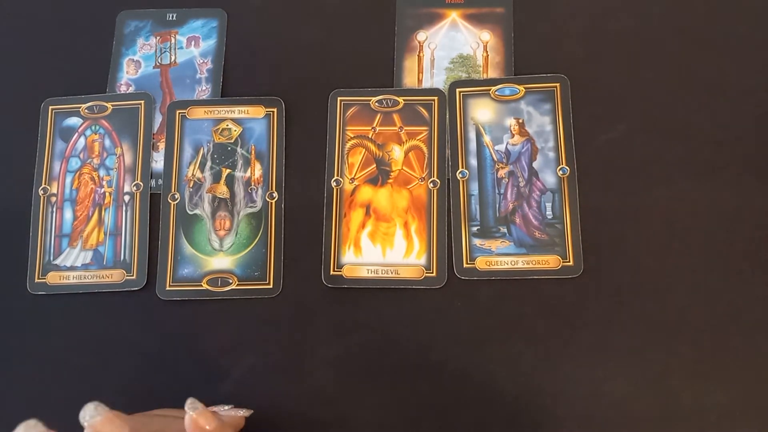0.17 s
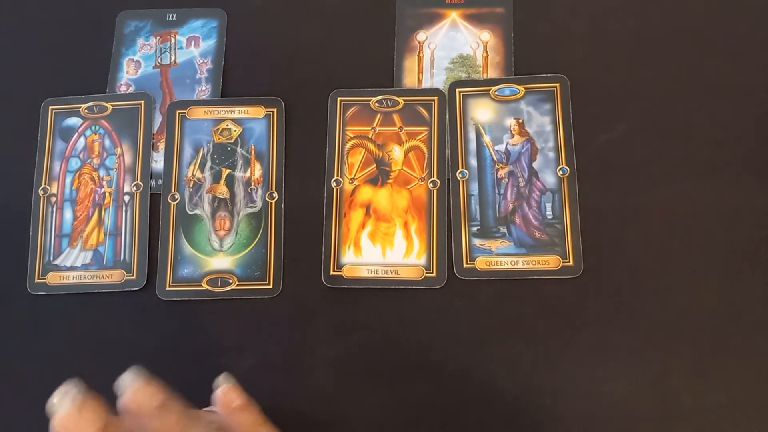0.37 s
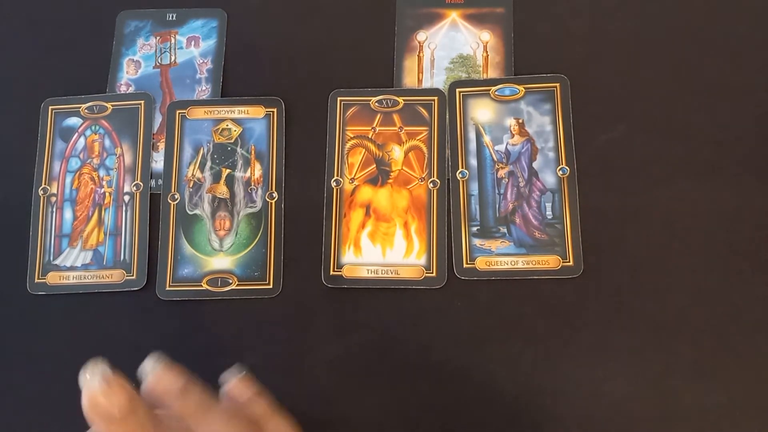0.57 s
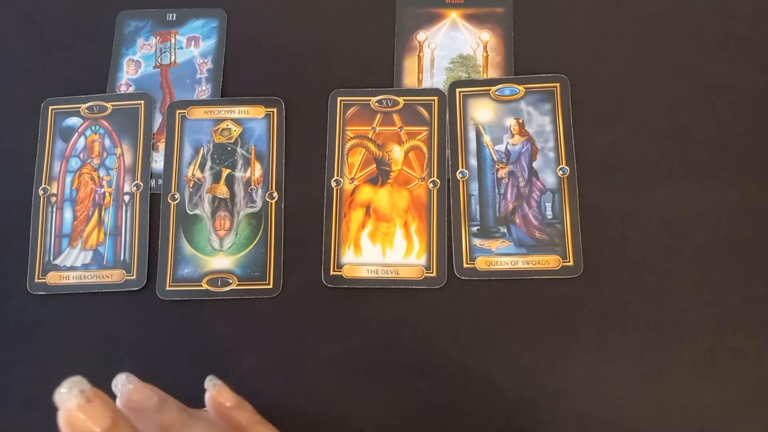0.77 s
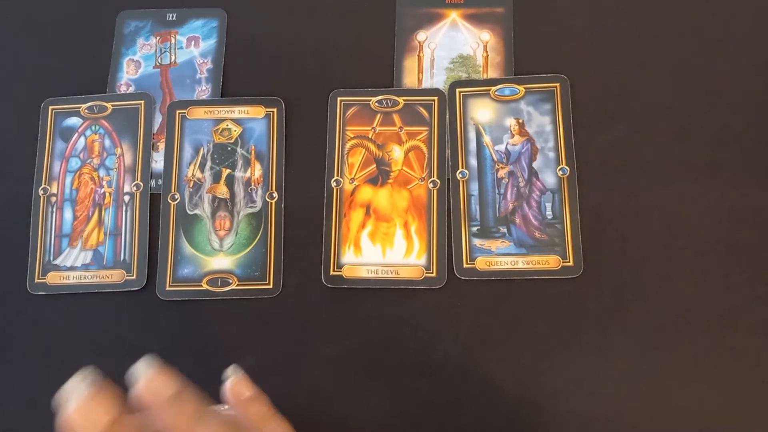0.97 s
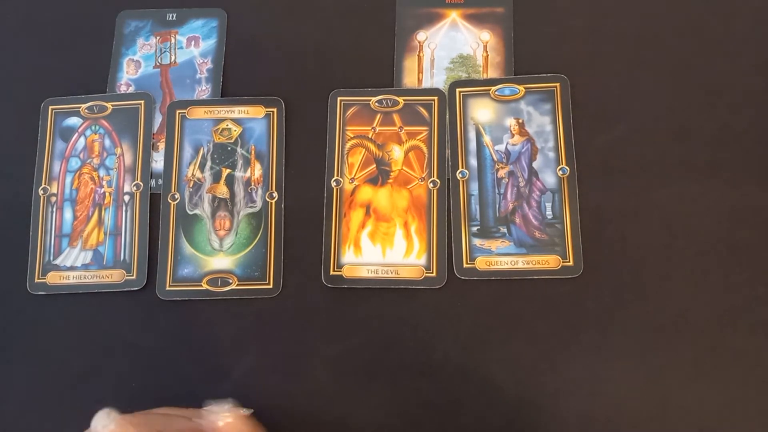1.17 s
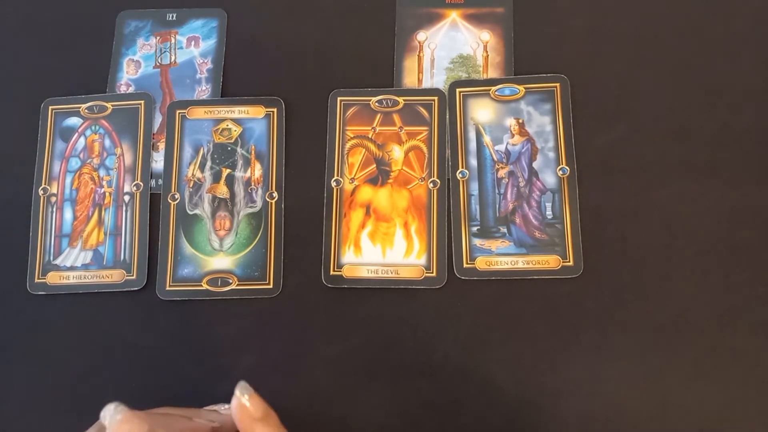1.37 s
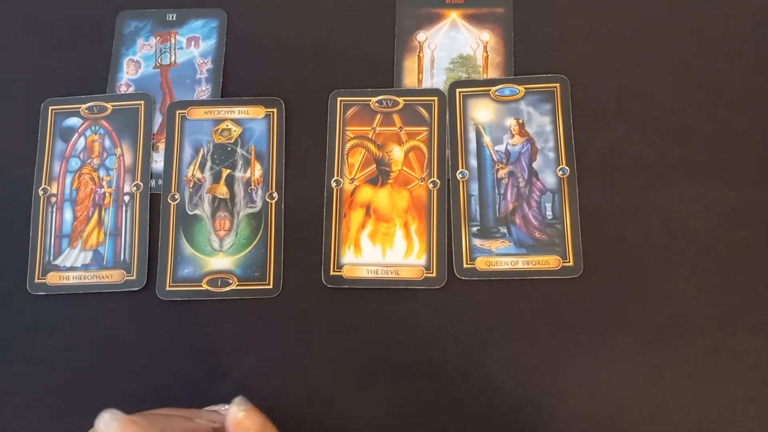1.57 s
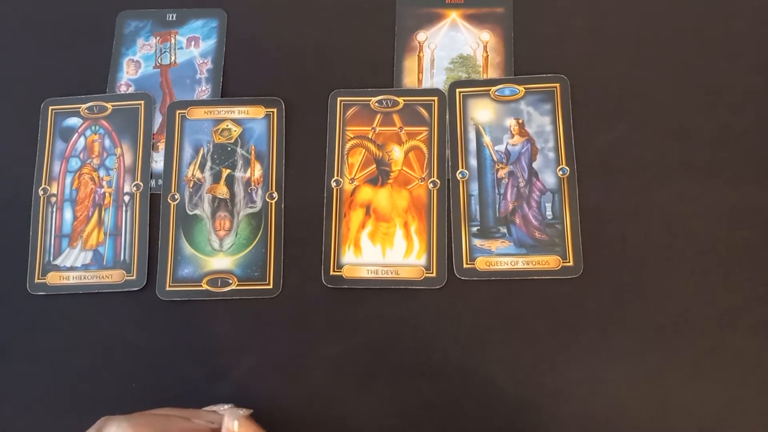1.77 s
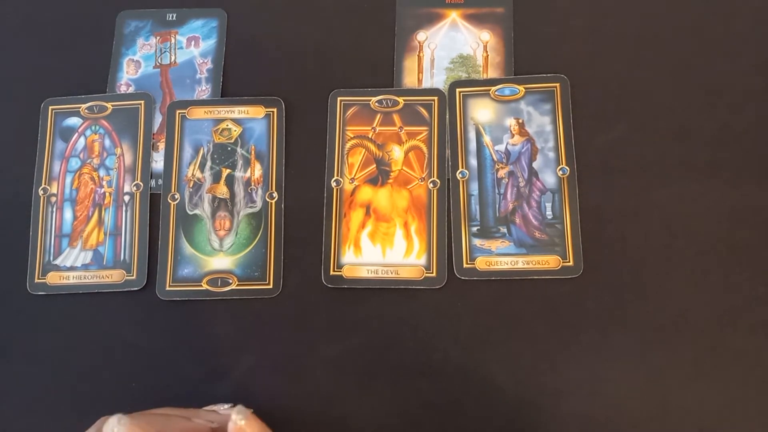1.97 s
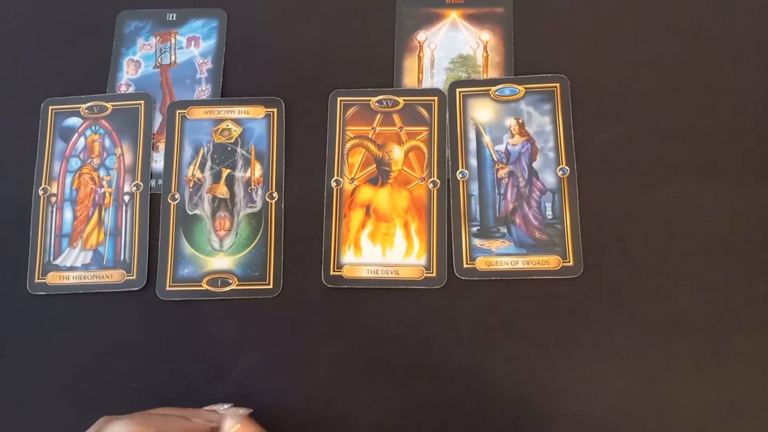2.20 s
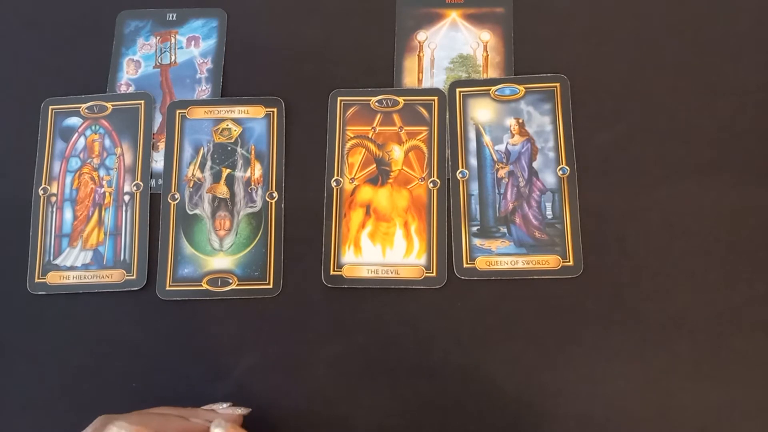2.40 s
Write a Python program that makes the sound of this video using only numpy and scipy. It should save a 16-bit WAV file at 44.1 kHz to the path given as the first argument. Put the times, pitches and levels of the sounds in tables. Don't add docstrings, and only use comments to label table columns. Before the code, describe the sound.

Soft uneven finger taps on a wooden table, about four a second, start at once and continue throughout; dull boomy thuds, tiny nail clicks, short room echo, low hum, and muffled car noise rising late.

```python
import sys
import numpy as np
from scipy import signal
from scipy.fft import rfft, irfft, next_fast_len
from scipy.io import wavfile
from scipy.ndimage import uniform_filter1d

SR = 44100
rng = np.random.default_rng(int(sys.argv[2]) if len(sys.argv) > 2 else 0)


def decibels_to_gain(level_db):
    exponent = np.asarray(level_db, float) / 20
    return 10 ** exponent


def store_wav(level_fs):
    pcm = np.round(np.clip(np.atleast_2d(level_fs), -1, 1) * 32767)
    wavfile.write(sys.argv[1], SR, pcm.T.astype(np.int16))


N = 107515

# f/Hz, level/dB
HUM_BODY = [(15, -75), (25, -31), (87, -0.5), (443, -28.5), (974, -37.5), (1180, -44.5), (2320, -41),
            (3040, -52.5), (16400, -53)]
# f/Hz, likeness (1 = alike)
HUM_LIKENESS = [(60, 0.98), (180, 0.42), (550, 0.15), (1650, 0.073), (4970, 0.033), (15000, 0.02)]
# t/s, level/dB
CAR_FADER = [
    (0.0, -104),
    (0.66, -82),
    (0.79, -78),
    (1.25, -78),
    (1.42, -71),
    (1.7, -70.5),
    (2.14, -65.5),
    (2.31, -65),
    (2.44, -62),
]
# f/Hz, level/dB
CAR_BODY = [(60, -3.5), (150, 6.5), (400, 2), (660, -6), (850, -2.5), (1090, -3.5), (1400, -12.5),
            (3000, -36.5)]
# f/Hz, likeness (negative = opposed)
CAR_LIKENESS = [(100, 0.9), (400, 0.91), (900, -0.23), (2000, -0.63)]
# t/s, thud level/dB, time until the level drops faster/s, lowest mode boost/dB
TAPS = [(.0134, -0.5, 0.068, 2.1), (.3138, 1.5, 0.096, 0), (.619, 2.5, 0.072, -2.2), (.9251, 2, .07, 0.8),
        (1.2389, 5, 0.084, -1.5), (1.4289, -1, 0.062, 1.5), (1.6213, -6, 0.06, 2.5),
        (1.7799, 2, 0.072, -4.5), (1.9137, -3.5, 0.07, 2.5), (2.1038, -2, 0.076, 0.5),
        (2.2729, -6.5, 0.02, 1), (2.4102, -1, .066, 1)]
BOARD_HZ = [68.9, 94.2, 121.8, 143.4, 184.4, 201, 228.8, 254.9, 272, 296.3, 333.5, 367.2]
IN_PHASE = [0, 3]
# level/dB, t60/s, rise/s, left-right balance/dB
BOARD_MODES = [(-36.5, 1.04, 0.024, -3.6), (-42.5, 0.2, 0.00074, -0.5), (-34, .11, 0.00035, -1.5),
               (-33.5, 0.038, 0.0018, -15.5), (-40, 0.29, 0.021, 1.5), (-44, 0.35, 0.0046, -5.7),
               (-37.5, 0.17, 0.023, 0), (-41.5, 0.29, 0.025, -7), (-43, 0.21, 0.00093, -0.5),
               (-56.5, 0.56, 0.0018, 1.5), (-45.5, 0.59, 0.0018, -1), (-56, 0.23, 0.008, 14.5), ]
# f/Hz, level/dB
WOOD_BODY = [(300, -5), (450, -9.5), (600, -21.5), (1000, -32.5), (1500, -33), (3000, -45)]
# t/s, nail ring f/Hz, second (mostly lower) ring f/Hz
TICK_PITCHES = [(.0147, 3700, 1370), (.314, 4050, 1370), (.6194, 8390, 4800), (.926, 7430, 4000),
                (1.2394, 7430, 1300), (1.4293, 7300, 3950), (1.4635, 11500, 7500), (1.6205, 7300, 9000),
                (1.7806, 7560, 1250), (1.9134, 7420, 11000), (2.1039, 7560, 4400), (2.2646, 8370, 5500),
                (2.4097, 8920, 4200)]
# click level/dB, nail ring level/dB, second ring level/dB
TICK_LEVELS = [(-45.5, -7, -14), (-45.5, -5, -10), (-42.5, -13, -6), (-49.5, 7, -3.5), (-50.5, 6, -7),
               (-46, 4, -9), (-69, -6, -11), (-54, -10, -15), (-46, 7, -13), (-59, -11, -2), (-48.5, 5, -6),
               (-58, -6, -11), (-53, 8, -4)]
# f/Hz, level/dB
CLICK_BODY = [(500, -28.5), (1300, -11.5), (2300, -9.5), (3500, -17.5), (5800, -9), (8400, 1.5),
              (12000, -5.5), (16000, -6)]
# t/s, level/dB
ECHOES = [
    (.0028, -9),
    (.0085, -10),
    (.0115, -15),
]
# f/Hz, level/dB
TICK_PAN = [(2000, 0), (5000, -2), (8000, 8), (14000, 4)]
# f/Hz, t60/s
ROOM_DECAY = [(500, 1), (2000, 0.55), (6000, 0.43), (14000, 0.12)]
# f/Hz, t60/s
SCATTER_DECAY = [(1000, .07), (4500, .09), (15000, .05)]
# f/Hz, t60/s
BOOM_DECAY = [(60, 0.076), (130, 0.94), (330, 0.53), (600, 0.37)]
# t/s, level/dB, f/Hz, length/s
LEANS = [
    (2.17, -38, 83.8, .1),
    (0.34, -49.5, 78.1, 0.13),
    (3.5, -39, 78.5, 0.049),
]
# t/s, level/dB
RUB_FADER = [
    (0.6, -94.5),
    (1.3, -79),
    (1.396, -79),
    (1.776, -77.5),
    (2.438, -83.5),
]
# f/Hz, level/dB
RUB_BODY = [(1500, -12), (2500, 0.5), (3200, -6.5), (5300, -13.5), (6300, -6.5), (7500, -2.5), (9000, -34),
            (16000, -9.5)]
# f/Hz, likeness
RUB_LIKENESS = [(2000, 0.05), (8000, 0.2)]
# f/Hz, level/dB
MIC = [(20, -26), (45, -9), (65, 0), (15750, 0), (15950, -18), (20000, -24)]

LEFT_LAG_S = 0.00027
HALVES = np.array([[0.5], [-0.5]])


def evened(x):
    return x / np.sqrt(np.mean(x ** 2) + 1e-20)


def read(points, hz):
    f, value = np.transpose(points)
    return np.interp(np.log(hz + 1), np.log(f + 1), value)


def add(mix, s, sound):
    part = mix[:, round(s * SR):][:, :sound.shape[1]]
    part += sound[:, :part.shape[1]]


def causal(points):
    log = np.log(decibels_to_gain(read(points, abs(np.fft.fftfreq(4096, 1 / SR)))))
    taps = np.fft.ifft(np.exp(log - 1j * signal.hilbert(log).imag)).real[:2048]
    return taps / np.linalg.norm(taps)


def fader(rows):
    s, db = np.transpose(rows)
    return decibels_to_gain(np.interp(np.arange(N) / SR, s, db, left=-120))


def noise(body, likeness):
    patchy_db = 1
    hz = np.fft.rfftfreq(1024, 1 / SR)
    a, b, c, d, patches = rng.standard_normal((N // 256 + 5, 513, 5)).T
    patches = uniform_filter1d(patches, size=8, axis=0)
    patches = evened(uniform_filter1d(patches, size=10, axis=1))
    same = np.clip(read(likeness, hz), -1, 1)[:, None]
    left = a + 1j * b
    right = same * left + np.sqrt(1 - same ** 2) * (c + 1j * d)
    z = np.array([left, right])
    z[0] *= np.exp(-2j * np.pi * hz * LEFT_LAG_S * (hz < 500))[:, None]
    z = z * decibels_to_gain(read(body, hz)[:, None] + patchy_db * patches)
    return evened(signal.istft(z, nperseg=1024, noverlap=768)[1][:, :N])


def tail(decays, db):
    taps = np.zeros((2, SR // 2))
    at = np.arange(40, SR // 2 - 20, 20)
    at = at + rng.integers(0, 20, (2, len(at)))
    np.put_along_axis(taps, at, rng.choice([-1., 1.], at.shape), 1)
    hz, t, z = signal.stft(taps, SR, nperseg=512)
    fade = decibels_to_gain(-60 * t / read(decays, hz)[:, None])
    out = signal.istft(z * fade, SR, nperseg=512)[1]
    return decibels_to_gain(db) * out / np.linalg.norm(out[0])


def room_hum():
    return decibels_to_gain(-56.5) * noise(HUM_BODY, HUM_LIKENESS)


def car():
    return decibels_to_gain(5.0) * fader(CAR_FADER) * noise(CAR_BODY, CAR_LIKENESS)


def late_fade(t, hold):
    fade_t60 = 0.18
    return decibels_to_gain(-60 * np.maximum(t - hold, 0) / fade_t60)


def thud(db, hold, spot):
    lag_cycles = 0.593
    t = np.arange(SR // 3) / SR
    out = np.zeros((2, SR // 3))
    for k, (hz, (mode_db, t60, rise, pan_db)) in enumerate(zip(BOARD_HZ, BOARD_MODES)):
        u = np.maximum(t - lag_cycles / hz - HALVES * LEFT_LAG_S, 0)
        swell = 1 - np.exp(-u / abs(rise))
        ring = swell * decibels_to_gain(-60 * u / t60) * np.sin(2 * np.pi * hz * u)
        sign = 1 if k in IN_PHASE else -1
        out += sign * decibels_to_gain(mode_db + spot[k] + pan_db * HALVES) * ring
    return decibels_to_gain(db) * out * late_fade(t, hold)


def rattle(db, hold, grit):
    wood_db, wood_t60, rise = -53.5, 0.74, 0.0055
    t = np.arange(grit.shape[1]) / SR
    ring = signal.fftconvolve(grit, causal(WOOD_BODY)[None], axes=1)[:, :len(t)]
    return decibels_to_gain(db + wood_db - 60 * t / wood_t60) * np.minimum(t / rise, 1) * ring * late_fade(t, hold)


def brief_ring(t, hz, q):
    return np.exp(-np.pi * hz / q * t) * np.sin(2 * np.pi * hz * t) * np.minimum(t * hz / 2, 1)


def tick(hz, low_hz, db, ring_db, low_db, grit):
    scratch, snap_t60, spread_db = 0.35, 0.0025, -5.5
    t = np.arange(len(grit)) / SR
    strike = (t == 0) + scratch * grit * decibels_to_gain(-60 * t / snap_t60)
    click = np.convolve(strike, causal(CLICK_BODY))[:len(t)]
    click = click / abs(click).max()
    ring = decibels_to_gain(ring_db) * brief_ring(t, hz, 8) + decibels_to_gain(low_db) * brief_ring(t, low_hz, 13)
    return decibels_to_gain(db) * np.array([click + ring, click + decibels_to_gain(spread_db) * ring])


def room(x):
    right_lag = 14
    taps = np.zeros((2, 1024))
    for s, db in [(0.00093, 0.11)] + ECHOES:
        left_at = round(s * SR)
        taps[[0, 1], [left_at, round(s * SR + right_lag)]] += decibels_to_gain(db)
    near = signal.fftconvolve(x[:1], taps, axes=1)[:, :N]
    pan_db = read(TICK_PAN, np.fft.rfftfreq(N, 1 / SR)) * HALVES
    near = irfft(rfft(near) * decibels_to_gain(pan_db), N)
    tails = tail(ROOM_DECAY, 3.5) + tail(SCATTER_DECAY, -3.5)
    return near + signal.fftconvolve(x[1:], tails, axes=1)[:, :N]


def boom(board):
    left, other = tail(BOOM_DECAY, -13)
    width = 0.3
    return signal.fftconvolve(board.mean(0)[None], [left, left + width * other], axes=1)[:, :N]


def lean(db, hz, length):
    t = np.arange(0, length, 1 / SR)
    push = np.sin(np.pi * t / length) * np.sin(2 * np.pi * hz * t)
    return decibels_to_gain(db) * push * decibels_to_gain([[-1], [1]])


def palm_rub():
    return decibels_to_gain(0.5) * fader(RUB_FADER) * noise(RUB_BODY, RUB_LIKENESS)


def scene():
    spot_db = 0.43
    board, nails = np.zeros((2, N)), np.zeros((2, N))
    spots = rng.standard_normal((len(TAPS), 12))
    wood = rng.standard_normal((len(TAPS), 2, 9000))
    for k, (s, db, hold, low_db) in enumerate(TAPS):
        add(board, s, thud(db, hold, np.r_[low_db, spot_db * spots[k, 1:]]))
        add(board, s, rattle(db, hold, wood[k]))
    grits = rng.standard_normal((len(TICK_LEVELS), 900))
    for (s, hz, low_hz), levels, grit in zip(TICK_PITCHES, TICK_LEVELS, grits):
        add(nails, s, tick(hz, low_hz, *levels, grit))
    for s, db, hz, length in LEANS:
        add(board, s, lean(db, hz, length))
    backgrounds = room_hum() + car() + palm_rub()
    return board + boom(board) + room(nails) + backgrounds


def band_limit(x):
    return signal.sosfilt(signal.butter(12, 16510, fs=SR, output="sos"), x)


def record(dry):
    size = next_fast_len(N + 4096)
    response = decibels_to_gain(read(MIC, np.fft.rfftfreq(size, 1 / SR)))
    heard = irfft(rfft(dry, size) * response, size)[:, :N]
    return band_limit(heard)


dry = scene()
out = record(dry)
store_wav(out)
```